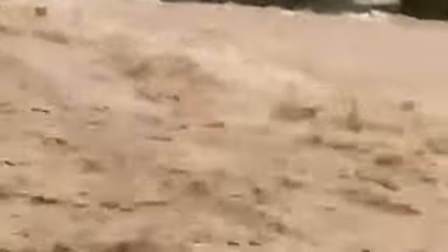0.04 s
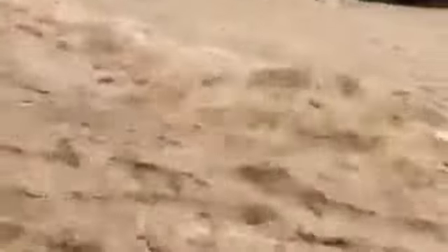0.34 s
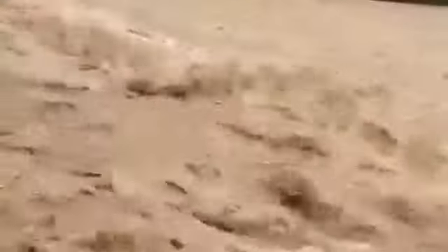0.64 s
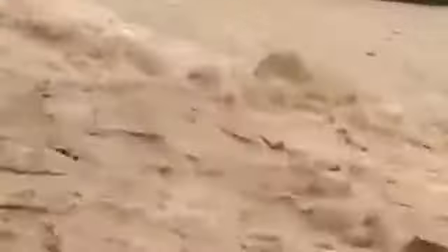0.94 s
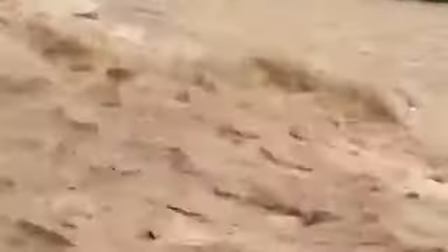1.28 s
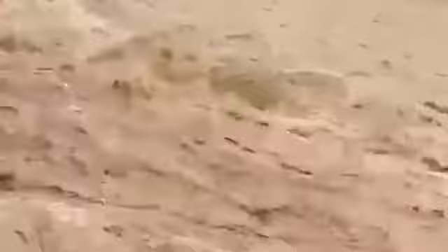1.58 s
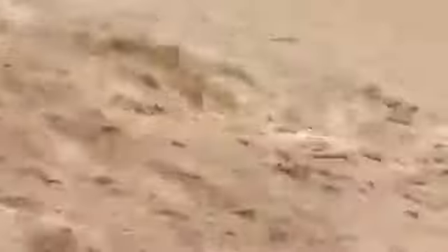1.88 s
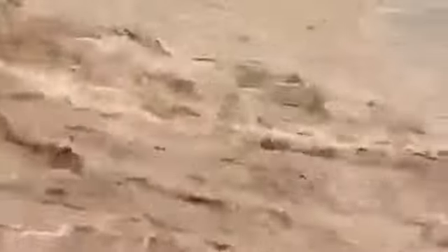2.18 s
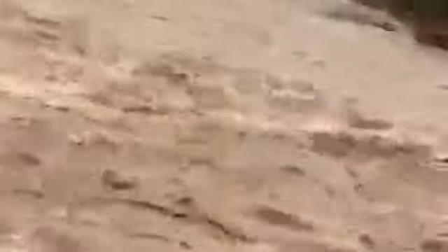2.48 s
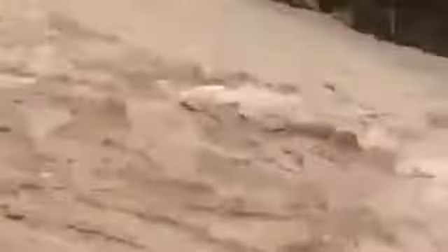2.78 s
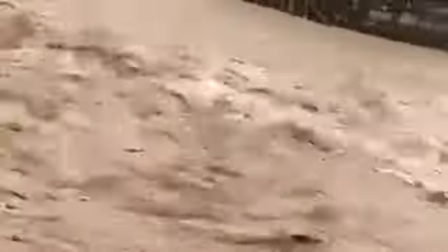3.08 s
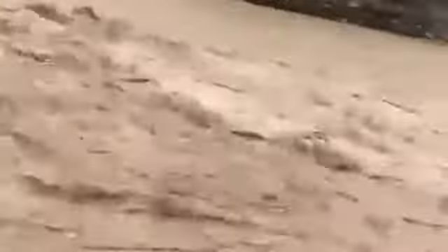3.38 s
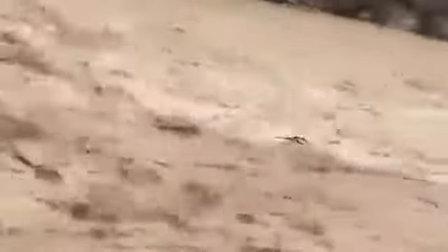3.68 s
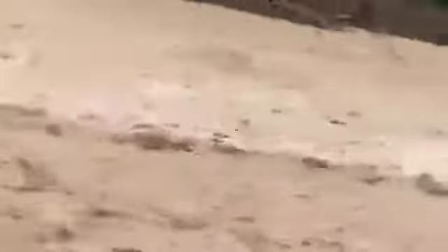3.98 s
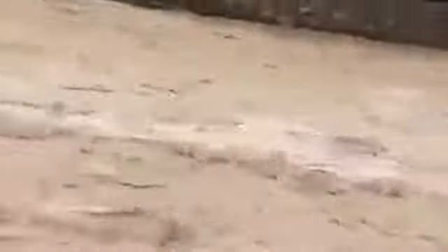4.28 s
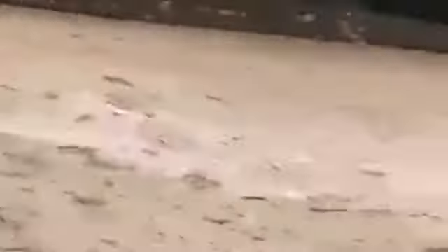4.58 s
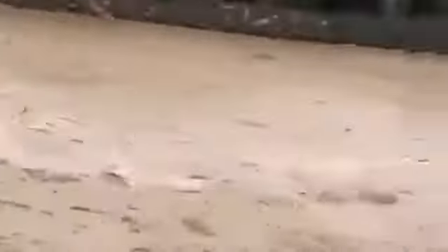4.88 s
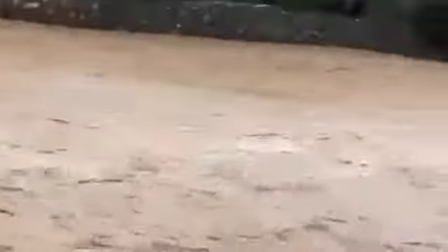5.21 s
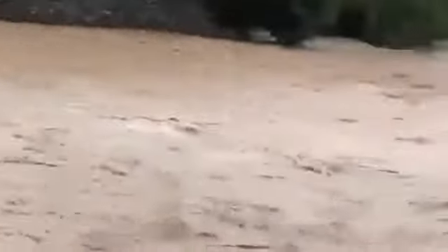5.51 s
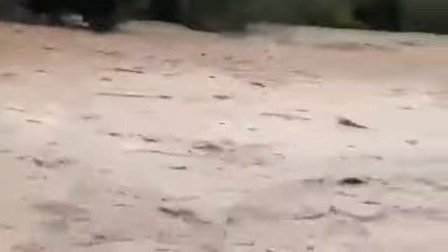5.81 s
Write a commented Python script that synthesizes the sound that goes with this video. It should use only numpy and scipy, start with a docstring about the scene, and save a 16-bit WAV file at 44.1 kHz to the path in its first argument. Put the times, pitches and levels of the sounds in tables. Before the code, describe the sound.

Fast floodwater churns down a channel some way off, roaring and rumbling continuously with faint gurgles and spray.

```python
"""A muddy channel in flash flood, some way off, heard through one dull microphone.
Clouds of trapped air throb in the churning water and make a steady roar, with brief low tones in it.
Heavy standing waves rumble, and breaking crests add a soft wash with a faint fizz of spray."""
import sys
import numpy as np
from scipy import signal
from scipy.fft import rfft, irfft, next_fast_len
from scipy.io import wavfile
from scipy.ndimage import uniform_filter1d

SR = 44100
rng = np.random.default_rng(int(sys.argv[2]) if len(sys.argv) > 2 else 0)


def dump_mix(stems):
    """Bounce the given channels to the path in sys.argv[1] as a 16-bit WAV at rate SR."""
    frames = np.atleast_2d(stems).T  # one column per channel
    limited = np.clip(frames, -1, 1)  # hard clip at full scale
    pcm = np.round(limited * 32767).astype(np.int16)
    wavfile.write(sys.argv[1], SR, pcm)


N = 266805

# lulls between waves, in roar and rumble: centre_s, length_s, change_db
LULLS = [(.27, 0.3, -0.9), (1.148, 0.12, -2.5), (2.494, 0.21, 0.5), (2.67, 0.079, -2.2),
         (3.063, 0.11, -1.1), (3.42, 0.1, -1.2), (3.83, 0.088, -0.5), (4.947, 0.074, -2.5),
         (5.424, 0.093, -0.5), (5.79, 0.15, -1.8)]


def current():
    """Countless far air pockets merge into a roar; nearer ones gurgle within it."""
    # roar spectrum: freq_hz, level_db
    roar_spectrum = [(70, -26.5), (140, -10.5), (200, -1), (270, -0.5), (335, -1.5), (420, -1),
                     (520, -0.24), (640, -3), (740, -10), (920, -17.5), (1300, -31), (3000, -71.5)]
    # surges of the current: peak_s, length_s, lift_db
    surges = [(0.066, 0.62, 1.9), (0.414, 0.12, 2.7), (1.49, 0.17, 2), (2.25, 0.23, 0.2), (2.89, 0.16, 2.2),
              (3.99, 0.17, 1.8), (4.884, 0.12, 0.7), (5.064, 0.11, 1), (5.24, 0.22, 0.9)]
    far = seething(depth_db=0.1, patch_s=0.024, patch_hz=120)
    near = bubbles(low_hz=171.6, high_hz=902.6, per_s=2000, decay_cycles=4.08, rise=0.018, spread_db=0.83)
    roar = coloured(far + gain_of(-9.0) * near, roar_spectrum)
    return flow_gain(surges + LULLS, base_db=-26.5, drift_db_per_s=0.06) * roar


def waves():
    """Masses of water plunge into the troughs: a lumpy rumble that builds at first."""
    # rumble spectrum: freq_hz, level_db
    rumble_spectrum = [(12, -29.5), (26, -23), (40, -8.5), (61, 3), (78, 1.5), (100, 1.4), (150, 0.6),
                       (210, -8), (330, -19.5), (800, -78.5)]
    # heavy plunging waves: peak_s, length_s, lift_db
    plunges = [(0.52, 0.5, 2.5), (1.46, 0.27, 3.8), (1.76, 0.12, 4.7), (1.988, 0.47, 4), (2.29, 0.15, 4),
               (3.15, 0.84, 2.5), (3.75, 0.1, 3.5), (3.99, 0.23, 3.2), (4.38, .2, 1), (4.68, .16, 3),
               (5.17, 0.23, 1.5), (5.693, 0.18, 3.5)]
    start_db, build_s = -2, 0.13
    build = gain_of(start_db * np.exp(-np.arange(N) / SR / build_s))
    rumble = coloured(seething(depth_db=1.0, patch_s=0.044, patch_hz=120), rumble_spectrum)
    return build * flow_gain(plunges + LULLS, base_db=-29, drift_db_per_s=-0.23) * rumble


def low_tones():
    """Brief low tones swell, waver and glide within the roar."""
    # tones: peak_s, length_s, pitch_hz, glide_oct_per_s, level_db
    tones = [(0.1, 0.33, 268, -0.3, -32.5), (0.359, .26, 170, 3.5, -31), (0.417, .14, 322, -0.3, -33.5),
             (0.552, .35, 138, 1.5, -30.5), (0.733, .2, 285, -1, -33.5), (0.774, 0.137, 180, .4, -30),
             (0.859, .13, 279, -1, -30.5), (0.921, .14, 506, -.8, -27.5), (1.857, .2, 315, 1, -34),
             (2.141, .36, 185, .4, -33.5), (2.759, .14, 516, .4, -29), (2.884, .15, 197, 0, -28.5),
             (2.895, .11, 457, 0.7, -32), (2.929, 0.18, 534, 0.5, -30.5), (3.594, 0.17, 269, -0.5, -33),
             (3.745, 0.11, 549, -0.3, -29.5), (4.161, .14, 538, 1.8, -32), (4.386, .12, 215, 0.2, -31),
             (4.522, .2, 445, 0, -31), (5.002, .22, 370, 1, -30.5), (5.278, .11, 560, -1.5, -34)]
    wobble_oct, wobble_s = 0.035, 0.014
    t = np.arange(N) / SR
    out = np.zeros(N)
    for peak_s, length_s, pitch_hz, glide_oct_per_s, level_db in tones:
        wobble = unit_rms(uniform_filter1d(rng.standard_normal(N), round(wobble_s * SR)))
        glide_oct = glide_oct_per_s * np.clip(t - peak_s, -length_s, length_s)
        freq_hz = pitch_hz * 2 ** (wobble_oct * wobble + glide_oct)
        tone = unit_rms(np.sin(2 * np.pi * np.cumsum(freq_hz) / SR))
        out += gain_of(level_db) * arch(t - peak_s, length_s) * tone
    return out


def crests():
    """Crests collapse into foam full of small bubbles and fling a flickering spray."""
    # wash and spray spectra: freq_hz, level_db
    wash_spectrum = [(350, -17), (700, 0), (930, 0), (1200, -7.5), (1650, -14.5), (1930, -17), (2300, -22),
                     (3200, -31), (4200, -43), (7000, -76.5)]
    spray_spectrum = [(1500, -16), (3200, 1.5), (3900, 0), (5000, -6.3), (7000, -16), (8300, -21.5),
                      (9800, -24.5), (11300, -31)]
    # breaking crests: peak_s, length_s, wash_lift_db, spray_lift_db
    breakers = [(.1, 0.19, 1.5, 0.5), (0.373, .18, 0.2, 0.9), (.7, 0.53, 1.2, -0.5), (.96, 0.15, 0.5, 0),
                (2.052, .2, 1, -1), (2.288, .24, 0.9, 1.5), (2.78, 0.55, 0.2, 2.8), (3.3, 0.55, 0, 1),
                (3.647, 0.51, 2.1, 0.5), (4, 0.46, 1.3, 1.9), (4.38, 0.36, 1.5, 0), (4.852, 0.35, 0.6, 0.5),
                (5.01, .12, 1.5, 2.8), (5.35, .4, -0.2, 0.5)]
    collapses = [(peak_s, length_s, lift_db) for peak_s, length_s, lift_db, _ in breakers]
    flings = [(peak_s, length_s, lift_db) for peak_s, length_s, _, lift_db in breakers]
    foam = seething(depth_db=0.6, patch_s=0.071, patch_hz=200)
    froth = bubbles(low_hz=745.3, high_hz=4232, per_s=2200, decay_cycles=18, rise=0.013, spread_db=2.0)
    wash = coloured(foam + gain_of(-9.5) * froth, wash_spectrum)
    wash *= flow_gain(collapses, base_db=-36.5, drift_db_per_s=-0.28)
    spray = coloured(seething(depth_db=2.5, patch_s=0.031, patch_hz=900), spray_spectrum)
    spray *= flow_gain(flings, base_db=-65.5, drift_db_per_s=-0.48)
    return wash + spray


def hiss():
    """Faint, even hiss behind the water."""
    # hiss spectrum: freq_hz, level_db
    hiss_spectrum = [(3500, -12), (6500, 0), (9000, -3.5), (11300, -8.5)]
    return gain_of(-81.5) * coloured(rng.standard_normal(N), hiss_spectrum)


def bubbles(low_hz, high_hz, per_s, decay_cycles, rise, spread_db, size_count=36):
    """Air pockets of many sizes ring briefly, rising in pitch as they near the surface."""
    out = np.zeros(N)
    for pitch_hz in np.geomspace(low_hz, high_hz, size_count):
        age = np.arange(0, 2 * np.pi, pitch_hz / (decay_cycles * SR))  # in decay times
        ring = np.sin(2 * np.pi * decay_cycles * age * (1 + rise * age / 2)) * np.exp(-age)
        born = rng.random(N) < per_s / size_count / SR
        strength_db = spread_db * np.minimum(rng.exponential(1, N), 3)[born]
        kicks = np.zeros(N)
        kicks[born] = gain_of(strength_db) * np.sign(rng.standard_normal(N)[born])
        # small pockets die sooner; weighting by pitch keeps the sum flat
        out += pitch_hz * signal.oaconvolve(kicks, ring)[:N]
    return unit_rms(out)


def seething(depth_db, patch_s, patch_hz, frame=512):
    """Flat noise that swells and sinks in patches of time and pitch as single waves come and go."""
    hop = frame // 4
    noise = signal.stft(rng.standard_normal(N), nperseg=frame, noverlap=frame - hop)[2]
    per_hz = np.fft.fftfreq(noise.shape[0], SR / frame)[:, None]
    per_s = np.fft.rfftfreq(noise.shape[1], hop / SR)
    blur = np.exp(-(per_hz * patch_hz) ** 2 * np.pi) / (1 + (np.pi * per_s * patch_s) ** 2)
    field = np.fft.rfft2(rng.standard_normal(noise.shape))
    patches_db = depth_db * unit_rms(np.fft.irfft2(field * blur, noise.shape))
    patchy = signal.istft(noise * gain_of(patches_db), nperseg=frame, noverlap=frame - hop)[1]
    return unit_rms(patchy[:N])


def flow_gain(swells, base_db, drift_db_per_s):
    """Gain of a slowly drifting flow, with one smooth bump or dip per swell."""
    t = np.arange(N) / SR
    level_db = base_db + drift_db_per_s * t
    for centre_s, length_s, change_db in swells:
        level_db += change_db * arch(t - centre_s, length_s)
    return gain_of(level_db)


def coloured(flat, spectrum):
    """Flat sound shaped to a spectrum (points joined on a log frequency axis), at rms 1."""
    size = next_fast_len(N + 8192)
    bin_hz = np.fft.rfftfreq(size, 1 / SR)
    freq_hz, level_db = np.transpose(spectrum)
    bin_db = np.interp(np.log(bin_hz + 1), np.log(freq_hz + 1), level_db)
    return unit_rms(irfft(rfft(flat, size) * gain_of(bin_db), size)[:N])


def arch(from_peak_s, length_s):
    """One smooth rise and fall between 0 and 1."""
    return np.cos(np.pi * np.clip(from_peak_s / length_s, -0.5, 0.5)) ** 2


def gain_of(db):
    """Decibels to amplitude."""
    return 10 ** (np.asarray(db) / 20)


def unit_rms(x):
    """Scale to rms 1."""
    return x / np.sqrt(np.mean(x ** 2) + 1e-20)


def scene():
    """The whole torrent, mono."""
    return (waves() + current() + crests() + low_tones() + hiss())[None]


def record(dry):
    """The dull microphone: a steep low-pass."""
    cutoff_hz = 11550
    taps = signal.firwin(511, cutoff_hz, window=("kaiser", 9), fs=SR)
    return signal.oaconvolve(dry, taps[None], "same")


dry = scene()
out = record(dry)
dump_mix(out)
```